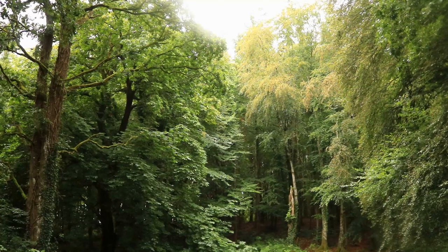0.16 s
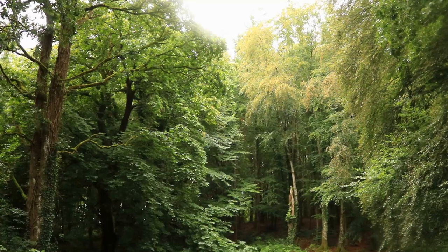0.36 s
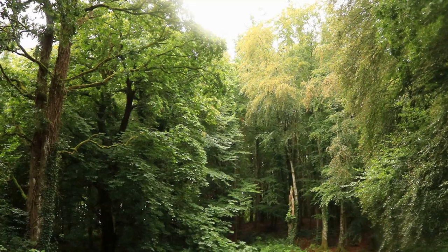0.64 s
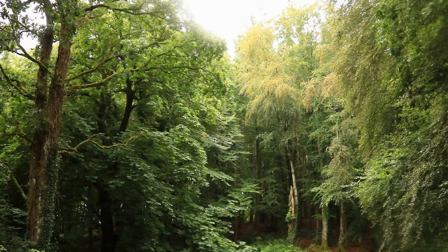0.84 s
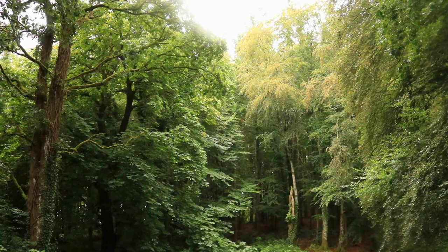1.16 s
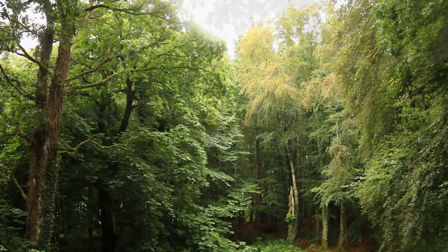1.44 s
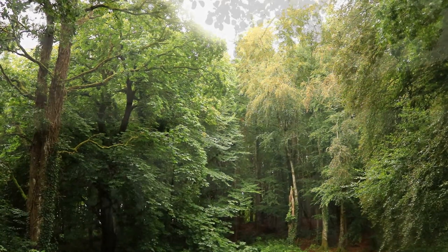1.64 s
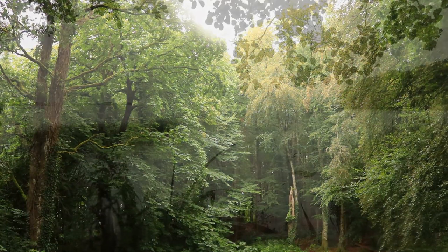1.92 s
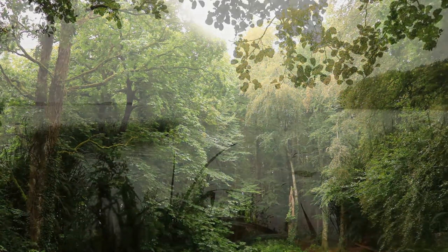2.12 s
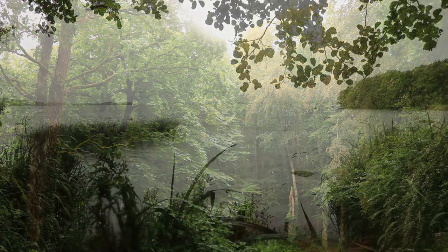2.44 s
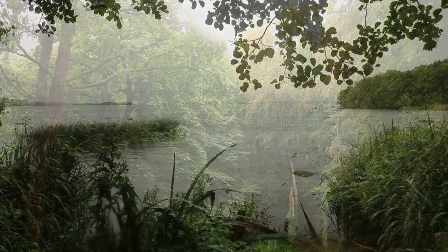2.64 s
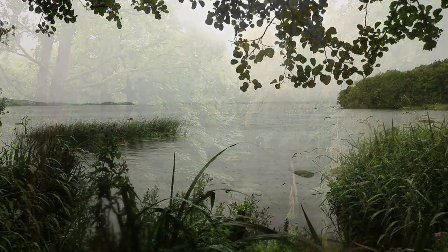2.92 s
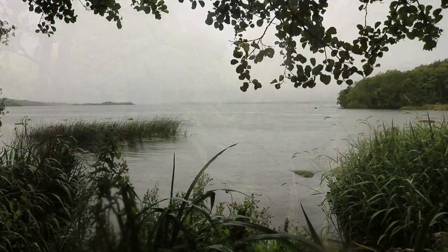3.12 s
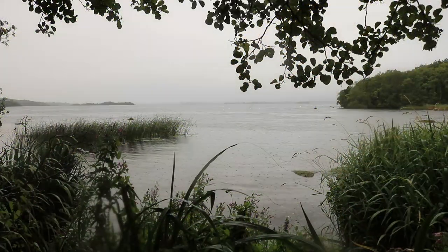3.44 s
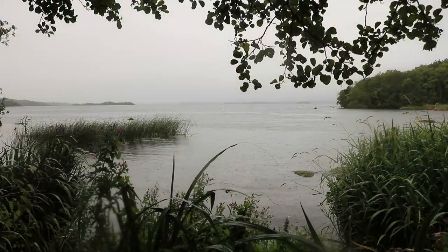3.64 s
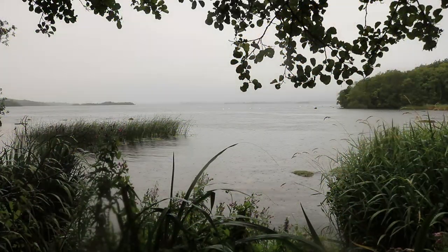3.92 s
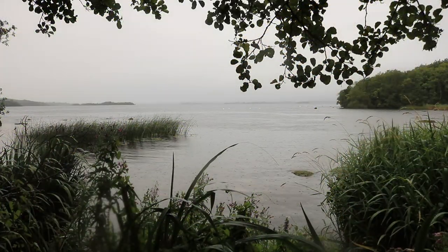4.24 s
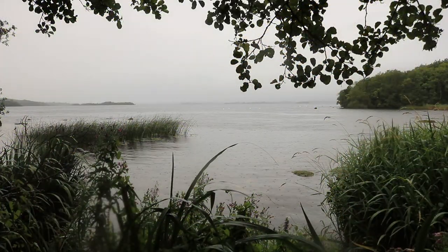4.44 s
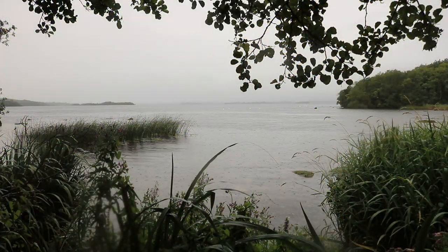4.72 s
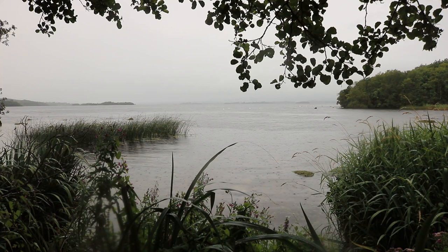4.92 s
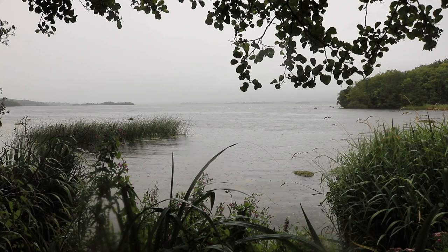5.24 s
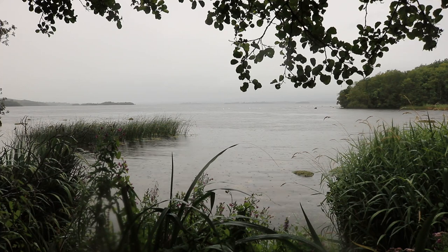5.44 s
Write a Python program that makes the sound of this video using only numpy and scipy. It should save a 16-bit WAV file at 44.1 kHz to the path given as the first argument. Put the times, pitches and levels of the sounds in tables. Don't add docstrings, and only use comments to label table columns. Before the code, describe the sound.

Fine rain hiss in woodland leaves melts into fuller lakeside patter, while close drops knock on a taut cover, hardest ones thudding and distorting.

```python
import sys
import numpy as np
from scipy import signal
from scipy.fft import rfft, irfft, next_fast_len
from scipy.io import wavfile
from scipy.ndimage import uniform_filter1d

SR = 44100
rng = np.random.default_rng(int(sys.argv[2]) if len(sys.argv) > 2 else 0)


def pcm_store(signal):
    levels = np.round(np.clip(np.atleast_2d(signal), -1, 1) * 32767)
    wavfile.write(sys.argv[1], SR, levels.astype(np.int16).T)


def attenuation_scalar(level_db):
    decades = np.asarray(level_db, float) / 20
    return 10 ** decades


N = 246078

# (time [s], knock level [dB], ring pitch [Hz], splash over the knock [dB], left over right [dB])
MIDDLE_KNOCKS = [(1.7651, -19, 1140, -19, 4.5), (1.9278, -17, 2360, -30, 12), (2.373, -7, 1540, -38, -18),
                 (2.693, -10, 1550, -40, -10), (2.8802, -7, 1300, -35, 15), (2.921, -9.5, 1580, -22, -3),
                 (3.2065, 7, 2100, -48, 12), (3.3348, -5.5, 2140, -40, -1), (3.3442, 7, 1400, -38.5, -7),
                 (3.382, 16, 1194, -43, -12.5), (3.4701, -0.5, 2550, -42, 9), (3.6256, 7.5, 1860, -43, 0),
                 (3.6604, -7, 1850, -34, 13), (4.5182, 8, 3000, -32, 19.5), (4.6893, 10.5, 2160, -35, 7),
                 (4.7165, -5, 1560, -40, 5), (4.7264, 1, 1570, -41, -7), (4.7317, -7, 1450, -30, 23),
                 (5.1226, 13, 1020, -24, -3.5)]
# (time [s], knock level [dB], ring pitch [Hz], splash over the knock [dB], left over right [dB])
RIM_TAPS = [(0.134, -17, 2500, -23.5, 6), (1.2957, -30, 2125, -15, 8), (1.7241, -22, 1550, -40, 14),
            (2.3671, -18, 1570, -31, -6), (2.5186, -12.5, 2030, -16.5, -6.5), (2.7204, -7.5, 2360, -35, 10),
            (2.7286, -6.5, 1280, -19, 3.5), (2.91, -22, 4500, -8, 4), (3.082, -10, 2400, -28, 11),
            (3.1762, -15, 1570, -33, 6), (3.366, -4, 1570, -33, -12), (3.3699, -9, 1700, -34, -6),
            (3.6325, -9.5, 1700, -23, 2.5), (4.0434, -21, 5200, -5, -2), (4.6478, -15, 1440, -22, 2.5),
            (4.6643, -6, 2320, -28, -4.5), (4.7039, 7, 2290, -55, 4), (4.758, -16, 1700, -25, -10),
            (5.4051, -0.5, 1700, -37, -3), (5.5537, -14, 1970, -23, -2.5)]
# (time [s], knock level [dB], ring pitch [Hz], splash over the knock [dB], left over right [dB])
STIFF_RINGS = [(0.088, -37.5, 1060, 0.5, 1), (0.3527, -29, 1450, -19, -8), (0.8684, -32, 2790, -7, -7),
               (1.831, -31, 1900, -40, -2), (2.1088, -28, 1830, -40, 14), (2.36, -28, 1590, -20, -9),
               (2.713, -26, 2170, -4.5, 12), (2.734, -14, 1810, -32, 7), (2.8175, -23, 2360, -24, -6),
               (2.883, -15, 2600, -40, 6), (2.896, -24, 1570, -40, -2), (3.3778, -15, 1910, -40, -5),
               (3.395, -12, 1340, -40, -18), (3.547, -22.5, 1570, -5.5, -23),
               (3.689, -26, 2130, -6.5, -2.5), (3.755, -20, 1610, -40, -12), (4.0592, -23.5, 4100, -8, 4),
               (4.2092, -24, 2380, -19, 10), (4.4768, -8, 2180, -29, 17), (4.4816, -22.5, 1450, -6, 4),
               (4.6766, -15.5, 1530, -8, 4), (5.1196, -30, 1590, -13, -19), (5.1231, 0.5, 3600, -44, -3),
               (5.3875, -30.5, 1850, -9, -1)]
# (time [s], level [dB], final pitch [Hz], extra early turns [cycles], left over right [dB])
COVER_SLAPS = [(2.7391, -22, 161, 0.28, 15), (3.019, -28, 181, .42, -2), (3.0813, -23, 220, 0.59, 14),
               (3.2065, -11.5, 234, 1.35, 22), (3.3503, -8, 129, 0.00037, -7), (3.3833, 4.5, 274, 0, -31),
               (4.4768, -13.5, 220, 1.45, 11), (4.5188, -16, 294, 2.05, 5), (4.6762, -20.5, 240, .62, 8),
               (4.6899, -24, 122, 0.051, 0), (4.7042, -28, 211, 1.7, -6), (4.7141, -26, 180, 0.43, 4),
               (5.1226, 7.5, 150, 0.9, -7.5)]
# (time [s], level [dB], final pitch [Hz], extra early turns [cycles], left over right [dB])
COVER_BOOMS = [(2.373, -28.5, 285, 0.91, -20), (2.5187, -26.5, 175, 0.47, -21),
               (2.6961, -26.5, 161, .4, -25), (2.7293, -20, 314, 1.27, 10), (2.877, -32, 159, .2, 21),
               (3.2119, -28.5, 160, 0, 19), (3.3457, -18, 231, 0.64, -11), (3.3865, -1.5, 294, 0, -22),
               (3.3984, -5, 162, 0.46, -23), (3.6268, -16, 142, 0.77, -6), (3.632, -19, 85, 0.44, -1),
               (4.712, -22, 85, 0.28, 3), (5.0523, -31, 242, 0.67, -13), (5.1257, 15, 144, 0.025, -11.5),
               (5.4052, -25, 294, 0.68, -3), (5.134, -10, 260, 0.2, -9), (5.165, -22, 72, 0, -3),
               (5.409, -24, 129, 0.002, -5)]
# (time [s], peak level [dB], centre pitch [Hz], left over right [dB])
LEAF_SPLATS = [(0.1345, -32, 3040, 5), (0.22, -30, 2070, 8), (0.271, -35, 3460, 6), (0.395, -43, 1530, 12),
               (0.788, -37, 3990, 3), (1.111, -34, 4600, 3), (1.295, -32, 1500, -4),
               (1.4515, -35, 3600, 1.5), (4.6465, -25, 1500, 3), (0.682, -34, 3500, 5),
               (3.395, -18, 3500, -6), (3.2065, -19, 3460, 21), (2.729, -18, 3180, 14),
               (2.254, -27.5, 1250, -10.5), (2.286, -39, 1480, -7), (3.052, -29, 2230, 2),
               (3.327, -26, 1900, -8), (3.429, -26, 2450, 10), (3.45, -27, 1460, -3),
               (3.8197, -28, 2900, 3.5), (3.842, -41, 1570, -2), (4.108, -43, 1650, 2),
               (4.223, -23.5, 1110, 4), (4.37, -20.5, 2880, 7), (4.739, -25, 1800, 2),
               (5.166, -22.5, 1550, 1.5), (5.31, -34, 3040, 6)]
# (time [s], peak level [dB], centre pitch [Hz], left over right [dB])
BRIGHT_TICKS = [(0.2188, -34.5, 10000, 6), (0.3316, -36, 8590, 8), (0.6794, -43, 8460, 5.0),
                (0.8244, -38, 8440, 7), (0.9294, -46, 8100, 5), (1.2443, -41, 8560, 8),
                (1.3573, -34, 8300, 8), (1.4044, -36, 9060, 9), (1.4332, -37, 8000, 1.5),
                (2.1594, -37, 9590, 8.5), (2.994, -38, 9310, 0.5), (3.054, -29, 6700, 1.5),
                (3.732, -36, 8700, 1), (3.8205, -39, 8700, 1.5), (4.3303, -36, 8090, -1.5),
                (4.79, -36.5, 8500, 1), (4.894, -33, 6500, 2), (4.3836, -32, 8950, -2.5)]
# (time [s], length [s], pitch [Hz], level [dB])
HOLLOW_PLOP = (.3545, .018, 350, -36.5)
# (frequency [Hz], level per hertz [dB])
SHORE_COLOUR = [(18, -50), (30, -20), (70, -8.5), (194, -10), (345, -6.5), (461, -5.5), (962, -5.5),
                (1460, 0.5), (1910, -3.5), (2410, -2.5), (4420, -11), (6600, -12.5), (8980, -21),
                (12600, -24.5), (16000, -33)]
# (frequency [Hz], likeness [-1 to 1])
SHORE_LIKENESS = [(60, 0.26), (240, 1), (950, 0.35), (3770, -0.12), (15000, 0.044)]
# (frequency [Hz], left over right [dB])
SHORE_TILT = [(60, -1), (240, 0.5), (950, -1), (3770, 4.5), (15000, 0.5)]
# (frequency [Hz], level per hertz [dB])
WOOD_COLOUR = [(18, -43), (30, -17), (134, -7.5), (221, -11.5), (526, -5.5), (760, -10.5), (866, -9),
               (1350, -7.5), (3980, -6), (8080, -11.5), (12300, -20), (14800, -31), (16000, -35)]
# (frequency [Hz], likeness [-1 to 1])
WOOD_LIKENESS = [(60, 0.12), (240, 0.48), (950, 0.34), (3770, -0.2), (15000, 0.099)]


def evened(x):
    return x / np.sqrt(np.mean(x ** 2) + 1e-20)


def read_curve(points, hz):
    point_hz, value = np.transpose(points)
    return np.interp(np.log(hz + 1), np.log(point_hz + 1), value)


def add(mix, start_s, sound, pan_db):
    for side, lean_db in enumerate((pan_db, -pan_db)):
        late = max(-lean_db, 0) * 0.6
        part = mix[side, round(start_s * SR + late):][:len(sound)]
        part += attenuation_scalar(min(lean_db, 0)) * sound[:len(part)]


def drops():
    out = np.zeros((2, N))
    t = np.arange(700) / SR
    bright = signal.butter(N=2, Wn=[2200, 9000], btype="band", fs=SR, output="sos")
    flatten = 1 - np.exp(-t / 0.00012)
    for rows, turns in ((MIDDLE_KNOCKS, 3.1), (RIM_TAPS, 6.3), (STIFF_RINGS, 16.7)):
        noises = rng.standard_normal((len(rows), 2, 700))
        for (start_s, db, hz, splash_db, pan_db), (spray, rattle) in zip(rows, noises):
            fade = flatten * attenuation_scalar(-60 * t * hz / turns)
            ring = -np.sin(2 * np.pi * hz * t) * fade
            splash = attenuation_scalar(splash_db + 12 - 60 * t / 0.0075) * signal.sosfilt(bright, spray)
            tail = evened(signal.oaconvolve(rattle, ring[:60])[:700])
            tail = tail * attenuation_scalar(-33 - 60 * t / 0.022)
            add(out, start_s, attenuation_scalar(db) * (ring + splash + tail), pan_db)
    return out


def thuds():
    out = np.zeros((2, N))
    t = np.arange(4000) / SR
    for rows, t60_s in ((COVER_SLAPS, 0.014), (COVER_BOOMS, 0.038)):
        for start_s, db, hz, early, pan_db in rows:
            turns = hz * t + early * (1 - np.exp(-t / 0.0015))
            add(out, start_s, -np.sin(2 * np.pi * turns) * attenuation_scalar(db - 60 * t / t60_s), pan_db)
    return out


def splats():
    out = np.zeros((2, N))
    t = np.arange(500) / SR
    rows = LEAF_SPLATS + BRIGHT_TICKS
    sprays = rng.standard_normal((len(rows), 500))
    for (start_s, db, hz, pan_db), spray in zip(rows, sprays):
        leaf = signal.butter(N=2, Wn=[hz / 1.7, hz * 1.6], btype="band", fs=SR, output="sos")
        puff = evened(signal.sosfilt(leaf, spray))
        add(out, start_s, attenuation_scalar(db - 60 * t / 0.013) * puff, pan_db)
    return out


def plop():
    start_s, length_s, hz, db = HOLLOW_PLOP
    out = np.zeros((2, N))
    t = np.arange(round(length_s * SR)) / SR
    turns = hz * t * (0.86 + 0.12 * t / length_s)
    swell = np.sin(np.pi * t / length_s)
    add(out, start_s, attenuation_scalar(db) * swell * np.sin(2 * np.pi * turns), -1.5)
    return out


def patter(per_s, spread_db, low_hz, high_hz, turns, bleed):
    t = np.arange(400) / SR
    out = np.zeros((2, N))
    size = attenuation_scalar(spread_db * np.minimum(rng.exponential(1, N), 3.2))
    size = size * (rng.random(N) < per_s / SR)
    kind = rng.integers(0, 48, N)
    rattles = (rng.random((48, 400)) < 0.03) * rng.standard_normal((48, 400))
    rattles = rattles * attenuation_scalar(-8 - 60 * t / 0.073)
    for k, hz in enumerate(np.tile(np.geomspace(low_hz, high_hz, 24), 2)):
        tap = -np.sin(2 * np.pi * hz * t) * np.exp(-t * hz / turns)
        tap = np.append(tap, np.zeros(399)) + np.convolve(tap, rattles[k])
        tap = tap * np.sqrt(hz) / np.linalg.norm(tap)
        out[k // 24] += signal.oaconvolve(size * (kind == k), tap)[:N]
    return evened(out + bleed * np.roll(out[::-1], 9, 1))


def wash(likeness, patchy_db, flicker_db):
    frames = N // 64 + 5
    hz = np.fft.rfftfreq(256, 1 / SR)
    a, b, c, d, patches, flicker = rng.standard_normal((frames, 129, 6)).T
    patches = uniform_filter1d(uniform_filter1d(patches, size=4, axis=0), size=30, axis=1)
    flicker = uniform_filter1d(uniform_filter1d(flicker, size=60, axis=0), size=6, axis=1)
    like = np.clip(read_curve(likeness, hz), -1, 1)[:, None]
    left = a + 1j * b
    right = like * left + np.sqrt(1 - like ** 2) * (c + 1j * d)
    wobble = attenuation_scalar(patchy_db * evened(patches) + flicker_db * evened(flicker))
    z = np.array([left, right]) * wobble
    return evened(signal.istft(z, nperseg=256, noverlap=192)[1][:, :N])


def coloured(x, spectrum):
    size = next_fast_len(N)
    hz = np.fft.rfftfreq(size, 1 / SR)
    level_db = read_curve(spectrum, hz) - 0.04 * np.maximum(hz - 15700, 0)
    return evened(irfft(rfft(x, size) * attenuation_scalar(level_db), size)[:, :N])


def shore():
    mix = wash(SHORE_LIKENESS, 1.6, 0.77) + attenuation_scalar(-8) * patter(800, 4.6, 340, 11260, 1.26, 0.53)
    left_colour = [(hz, db + read_curve(SHORE_TILT, hz)) for hz, db in SHORE_COLOUR]
    left = attenuation_scalar(0.9) * coloured(mix, left_colour)[0]
    right = coloured(mix, SHORE_COLOUR)[1]
    return np.array([left, right])


def woodland():
    mix = wash(WOOD_LIKENESS, 0.54, 0.74) + attenuation_scalar(-9) * patter(500, 1.9, 710, 9100, 0.42, 0.15)
    return coloured(mix, WOOD_COLOUR) * attenuation_scalar([[0.5], [-0.5]])


def scene():
    t = np.arange(N) / SR
    low_cut = signal.butter(N=2, Wn=95, btype="high", fs=SR, output="sos")
    close = signal.sosfilt(low_cut, drops() + thuds() + splats())
    shore_gain = attenuation_scalar(-35.5) * np.interp(t, (1.48, 3.03), (0, 1)) ** 1.18
    wood_gain = attenuation_scalar(-43.5) * np.interp(t, (1.31, 2.72), (1, 0)) ** 0.48
    return close + plop() + shore_gain * shore() + wood_gain * woodland()


def roll_off(x):
    return signal.sosfilt(signal.butter(12, 16430, fs=SR, output="sos"), x)


def record(dry):
    power = uniform_filter1d((dry ** 2).mean(0), size=90)
    power_db = 10 * np.log10(abs(power) + 1e-12)
    over_db = np.clip(1.52 * (power_db + 12.5), 1e-3, 23)
    fall = np.arange(N) / SR / 0.046
    held_db = np.exp(np.maximum.accumulate(np.log(over_db) + fall) - fall)
    late_db = np.roll(uniform_filter1d(held_db, size=260), 150)
    clipped = np.clip(dry / attenuation_scalar(late_db), -1, 1)
    treble_cut = signal.firwin(numtaps=101, cutoff=16200, fs=SR)[None]
    mix = signal.oaconvolve(clipped, treble_cut, "same")
    return roll_off(mix)


dry = scene()
out = record(dry)
pcm_store(out)
```